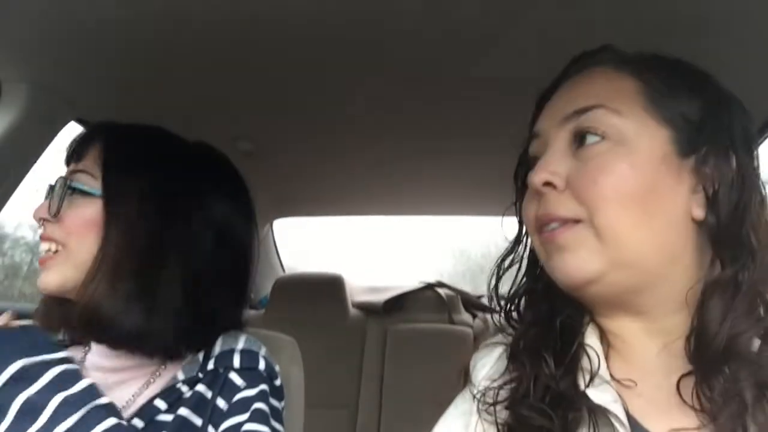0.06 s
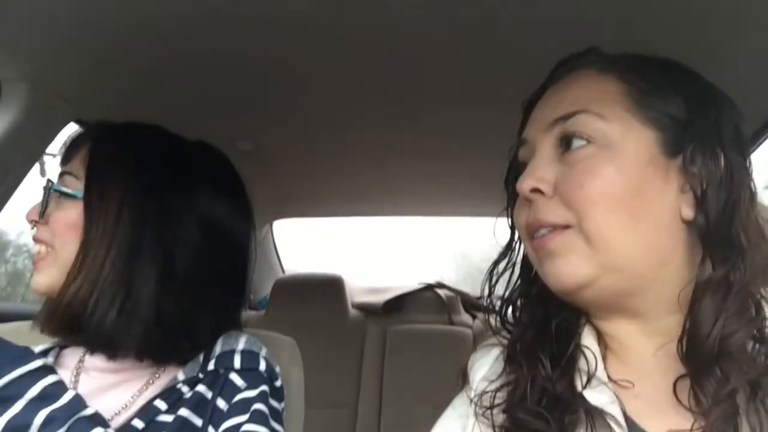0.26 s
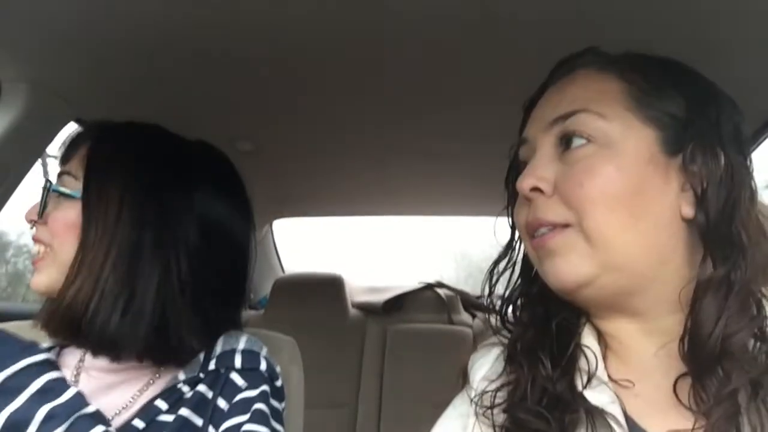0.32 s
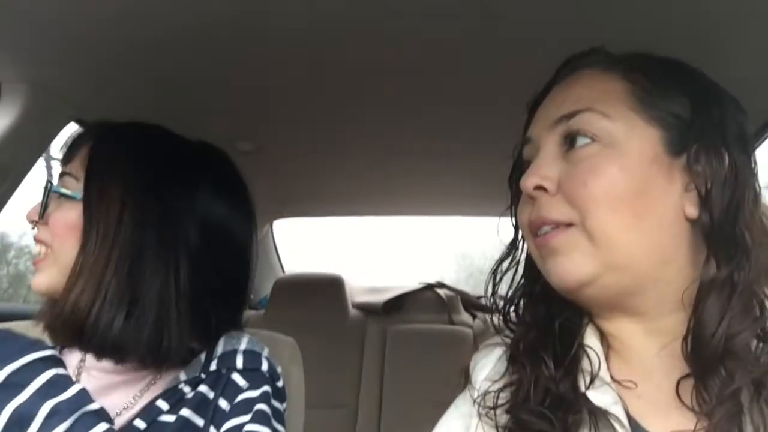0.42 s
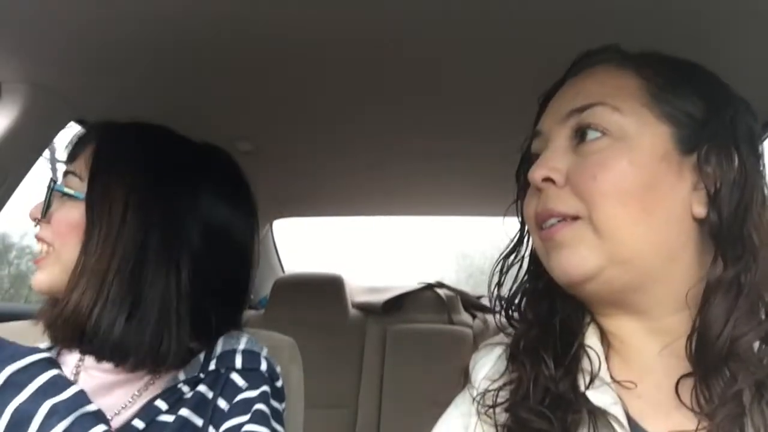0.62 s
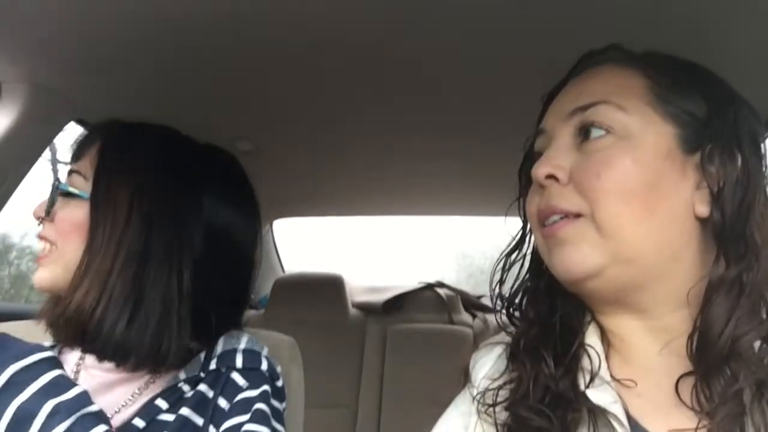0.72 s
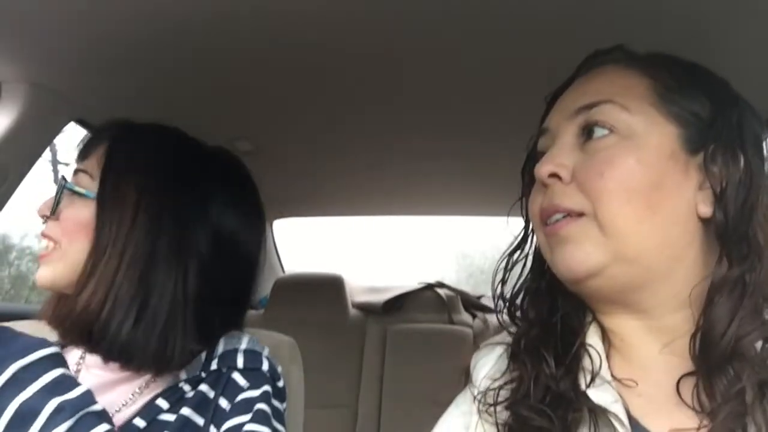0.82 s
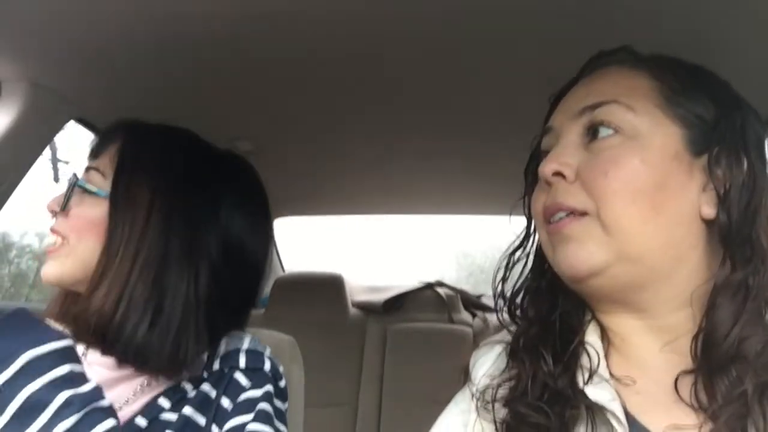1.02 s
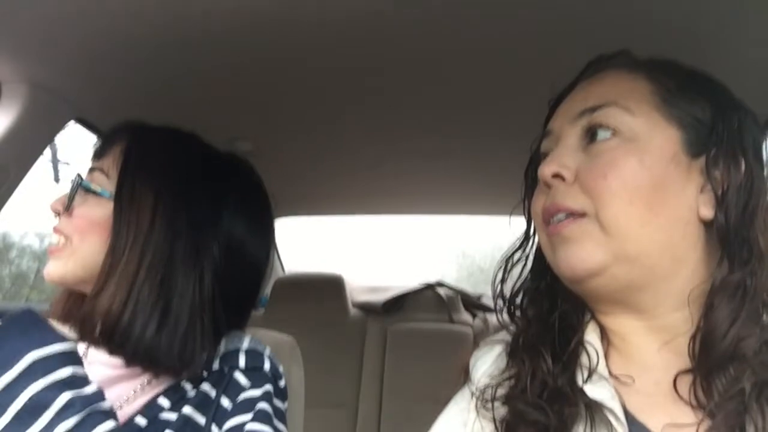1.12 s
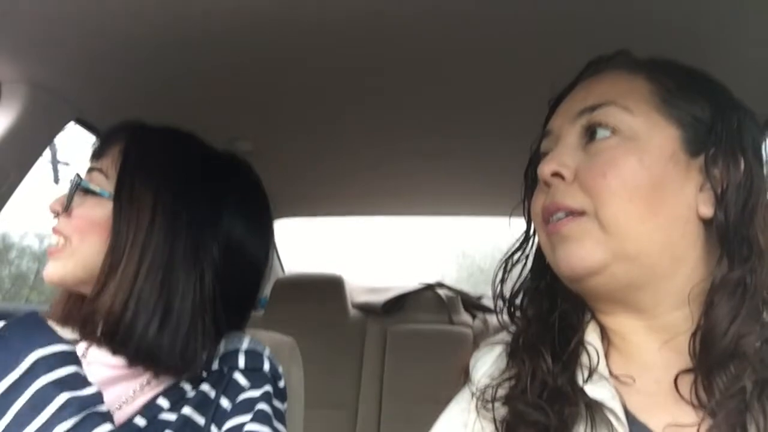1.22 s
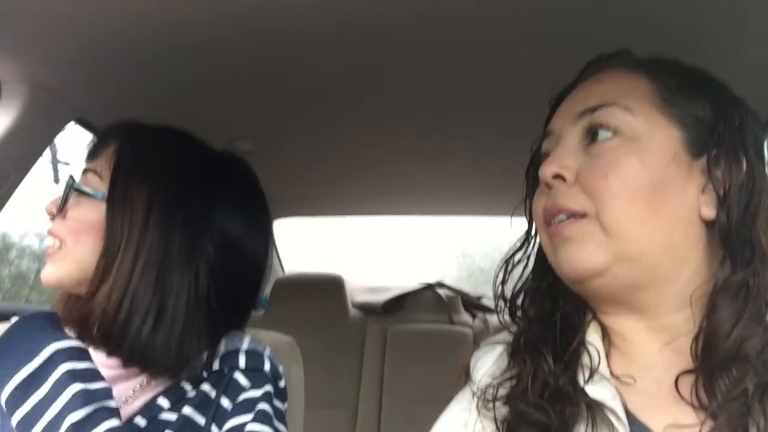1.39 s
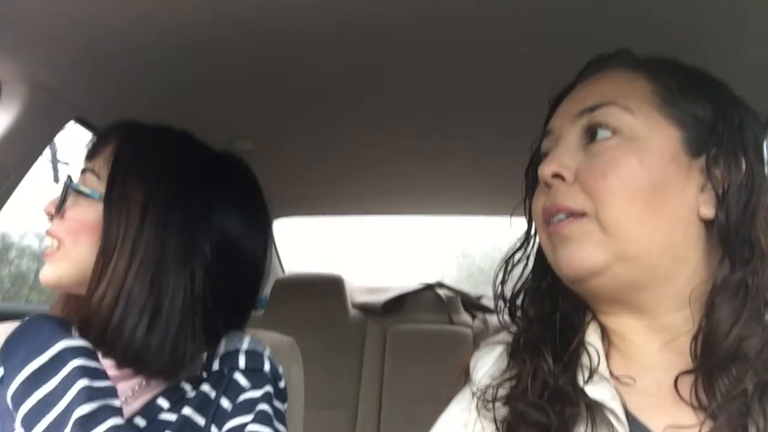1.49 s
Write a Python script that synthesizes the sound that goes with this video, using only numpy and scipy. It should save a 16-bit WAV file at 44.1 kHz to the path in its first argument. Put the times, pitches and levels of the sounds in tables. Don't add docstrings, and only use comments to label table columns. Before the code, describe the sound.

Power window switch clicks, door mechanism knocks and thuds, then motor whine and rubbing glass

```python
import sys
import numpy as np
from scipy import signal
from scipy.io import wavfile

SR = 44100
rng = np.random.default_rng(int(sys.argv[2]) if len(sys.argv) > 2 else 0)


def invert_db(x):
    u = np.asarray(x, float) / 20
    return 10 ** u


def unload_audio(sound):
    columns = np.transpose(np.atleast_2d(sound))
    steps = np.round(np.clip(columns, -1, 1) * 32767)
    wavfile.write(sys.argv[1], SR, steps.astype(np.int16))


N = 68355

# (frequency [Hz], density [dB per Hz])
CABIN_SPECTRUM = [(79, -5.5), (135, -30), (143, -41), (250, -10), (648, -13.5), (702, -24), (927, -26),
                  (14100, -43), (15500, -54)]
CABIN_DB = -65.5
BOOM_HZ, BOOM_WIDTH_HZ, BOOM_DB = 101.6, 57, -65
HISS_FLICKER_DB = 0.6

# (multiple of firing rate [-], level [dB])
IDLE_ORDERS = [(2, 1), (3, -8), (4, -8.5), (5, -18)]
# (time [s], level [dB])
IDLE_HUNTING = [(0.0, -44), (0.064, -57), (0.138, -50), (0.176, -48), (0.21, -94), (0.28, -54),
                (0.388, -52), (0.444, -42), (0.492, -50.5), (0.958, -50.5), (1.018, -56.5), (1.38, -53),
                (1.498, -50), (1.55, -46)]
# (frequency [Hz], level [dB], t60 [s])
INJECTOR_TICK = [(6750, -74, 0.015), (8950, -75, 0.0094), (12100, -75, 0.01)]
FIRING_HZ, FIRING_PEAK_S, FIRST_TICK_S = 23.0, 0.031, 0.0435
IDLE_DB, IDLE_WOBBLE_DB, ORDER_LAG_RAD = -1, 1.2, 2.0

# (time [s], level [dB])
SHUDDER_LEVEL = [(.17, -99), (.205, -40.5), (.25, -46), (.3, -48), (.335, -48), (.39, -47.5), (.43, -52.5),
                 (.47, -56), (.54, -62), (.67, -57), (.78, -60), (.86, -64), (.94, -91), (1.05, -63.5),
                 (1.2, -71), (1.27, -62), (1.36, -65.5), (1.55, -60)]
# (frequency [Hz], width [Hz], level [dB])
SKIN_MODES = [(150, 74, -2), (220, 102, -0.5), (305, 72, -5.5), (359, 103, -3.5)]
# (time [s], peak level [dB], pitch [Hz], t60 [s])
SKIN_THUDS = [(0.10, -47.5, 98, 0.15), (0.182, -36, 92, 0.1), (0.369, -33, 80, 0.055),
              (0.21, -23, 110, 0.045), (0.216, -40, 62.8, 0.55), (0.26, -40.5, 164.5, 0.095),
              (0.273, -38, 67, 0.044), (0.241, -31, 147.7, 0.11), (0.323, -34.5, 89.8, 0.17),
              (0.377, -18.5, 77, 0.048), (0.444, -29, 68, 0.039)]

# (time [s], peak level [dB], colour centre [Hz], rattle length [s], colour width [octaves])
KNOCK_EVENTS = [(0.15, -59, 590, 0.01, 0.57), (.166, -61, 1990, 0.018, 0.16),
                (0.188, -54, 1800, .002, 0.16), (.200, -39.5, 2530, 0.0022, 0.49),
                (.201, -39, 810, 0.067, 0.45), (.204, -35.5, 384, 0.0066, 0.35),
                (0.2309, -25.5, 3240, 0.0009, 0.66), (.2345, -37, 3070, 0.0027, 1.1),
                (0.2622, -26, 1710, 0.0029, 0.63), (.265, -27.5, 575, 0.0096, 0.41),
                (0.2653, -28.5, 5540, 0.0046, .8), (0.2664, -23, 2000, 0.00075, 2.26),
                (.2665, -22, 1185, 0.0061, 0.37), (0.2695, -27.5, 3020, 0.002, 0.67),
                (0.2723, -36, 1120, 0.0041, 1.4), (0.276, -33.5, 1280, 0.016, 1.2),
                (0.288, -37.5, 390, 0.0044, 0.48), (.30, -41, 1000, 0.075, 1.03),
                (0.31, -41.5, 3060, 0.0071, 0.57), (0.334, -40, 1300, 0.0056, 1.8),
                (0.343, -38, 443, .004, 0.73), (.374, -46, 1500, 0.0073, 0.57),
                (.6275, -38, 1300, 0.0043, 0.54), (0.6255, -40.5, 520, 0.007, 0.42),
                (0.634, -46, 450, .004, .6), (1.116, -49, 340, 0.016, 0.59)]
# (frequency [Hz], level [dB])
LINKAGE_MODES = [(355, 4.5), (595, 2.5), (700, -4.5), (825, -7), (1090, -4.5), (1170, 8), (1430, -1.5),
                 (1720, 4), (2100, 0), (2350, -2.5), (3050, -2), (4200, 3.5), (6250, -4), (8150, 1)]
RATTLE_PER_S, CRUNCH_DB, CONTACT_CUT_HZ = 2100, -5, 11500
LINKAGE_T60_S, DAMPING_SLOPE = 0.028, 0.22

# (time [s], commutator pitch [Hz], whine level [dB])
MOTOR_RUN = [(0.401, 1353, -78), (.47, 1317, -75), (0.54, 1311, -58), (.60, 1308, -55.5),
             (.632, 1316, -50.5), (0.65, 1220, -64), (.68, 1257, -60.5), (0.726, 1274, -55.5),
             (0.766, 1218, -62), (0.83, 1211, -56.5), (0.904, 1164, -59.5), (1.01, 1145, -55.5),
             (1.041, 1088, -55.5), (1.151, 1101, -58.5), (1.31, 1086, -58.5), (1.448, 1084, -59.5),
             (1.55, 1104, -57.5)]
# (multiple of shaft speed [-], level against whine [dB], resonance [Hz], width [Hz])
SHAFT_ORDERS = [(1, -3.5, 108, 6), (7, -12.5, 890, 60), (9, -12, 972, 10), (11, -9, 1340, 40),
                (19, -14, 2075, 14)]
COMMUTATOR_SEGMENTS = 10
WHINE_WOBBLE_DB, ORDER_WOBBLE_DB, PITCH_JITTER = 2.0, 3.5, 0.006
# (time [s], level [dB])
DRIVE_EFFORT = [(.183, -100), (.19, -62), (.215, -51.5), (.245, -54), (.258, -58), (.272, -44.5),
                (.292, -59.5), (.316, -48.5), (.345, -51), (.36, -52), (.385, -53), (.41, -54.5),
                (.6, -53.5), (.75, -55), (1.16, -55.5), (1.38, -56.5), (1.55, -59)]
# (frequency [Hz], width [Hz], level [dB])
PANEL_MODES = [(340, 31, -2), (1395, 62, -0.5), (1814.6, 20, 6), (1954, 39, -1.5), (2072, 24, -2.5),
               (2230, 117, -3.5), (2578, 65, -1), (2922, 123, -3), (3350, 106, 0), (3835, 138, -4.5),
               (4420, 275, -9), (6260, 650, -11.5), (7670, 510, -14.5), (8970, 1060, -19.5)]
BRUSH_DB, TURN_DEPTH, PANEL_FLICKER_DB = 0.5, 0.16, 2.5
SMALL_MODES, SMALL_WIDTH_HZ, SMALL_FLICKER_DB = 90, 36, 3.5
SMALL_DB, SMALL_TILT_DB_PER_OCT = -6.5, -6.5
# (frequency [Hz], density [dB per Hz])
SEAL_SPECTRUM = [(76, -47), (130, -55), (159, -8.5), (383, -14), (772, -8.5), (1860, -6), (3330, -12),
                 (7710, -21.5), (15500, -33.5)]
# (time [s], level [dB])
SEAL_PRESSURE = [(.2, -25), (.23, 1.5), (.33, 2.5), (.42, -2), (.5, 3), (.62, -5), (.72, 1), (.85, 1),
                 (1.0, 2), (1.19, 3.5), (1.25, 0.5), (1.4, 0), (1.5, 2.5), (1.55, 5)]
SEAL_DB, SEAL_GRIPS_S, BRIGHT_FROM_HZ = -2.5, 0.224, 5500
# (frequency [Hz], width [Hz], depth at start [0-1], depth at end [0-1])
DOOR_HOLLOWS = [(480, 130, 0.74, .3), (1040, 210, .75, 0), (815, 360, 0, 0.84), (1430, 490, 0.24, 0.49)]

MIC_LOW_HZ, TOP_HZ = 30, 15800


def rms_one(x):
    return x / np.sqrt(np.mean(x ** 2) + 1e-20)


def in_time(rows, before=None):
    s, *columns = np.transpose(rows)
    return [np.interp(np.arange(N) / SR, s, c, left=before) for c in columns]


def drift(rate_hz):
    r = np.exp(-2 * np.pi * rate_hz / SR)
    white = rng.standard_normal(N + SR)
    return rms_one(signal.lfilter([1], [1, -2 * r, r * r], white)[SR:])


def resonate(x, hz, width_hz):
    r = np.exp(-np.pi * width_hz / SR)
    poles = [1, -2 * r * np.cos(2 * np.pi * hz / SR), r * r]
    return signal.lfilter([(1 - r * r) / 2, 0, (r * r - 1) / 2], poles, x)


def ring(clicks, hz, t60):
    r = invert_db(-60 / (t60 * SR))
    w = 2 * np.pi * hz / SR
    return signal.lfilter([0, np.sin(w)], [1, -2 * r * np.cos(w), r * r], clicks + 1e-18)


def banded_noise(spectrum, patchy_db):
    out = 0
    edges = 22 * 2 ** np.arange(0, 10, 0.5)
    white = rng.standard_normal((2, N + 9000))
    hz, db = np.transpose(spectrum)
    for k, (low, high) in enumerate(zip(edges, edges[1:])):
        sos = signal.butter(2, [low, high], "band", fs=SR, output="sos")
        band = signal.sosfilt(sos, white[k % 2])[-N:]
        band_db = np.interp(np.log(low * high) / 2, np.log(hz), db)
        out = out + band * invert_db(band_db + patchy_db * drift(10.0))
    return rms_one(out)


def cabin():
    boom = resonate(rng.standard_normal(N + SR), BOOM_HZ, BOOM_WIDTH_HZ)
    boom = resonate(boom, BOOM_HZ, 2 * BOOM_WIDTH_HZ)[SR:]
    floor = banded_noise(CABIN_SPECTRUM, HISS_FLICKER_DB)
    return invert_db(BOOM_DB) * rms_one(boom) + invert_db(CABIN_DB) * floor


def engine():
    firing_time = np.cumsum(1 + 0.004 * drift(3)) / SR - FIRING_PEAK_S
    phase = 2 * np.pi * FIRING_HZ * firing_time
    hunt_db, = in_time(IDLE_HUNTING)
    out = np.zeros(N)
    for k, db in IDLE_ORDERS:
        order_db = db + IDLE_DB + (hunt_db if k == 2 else hunt_db.mean())
        level = np.sqrt(2) * invert_db(order_db + IDLE_WOBBLE_DB * drift(2.0))
        out += level * np.cos(k * phase - ORDER_LAG_RAD / k)
    clicks = np.zeros(N)
    clicks[(np.arange(FIRST_TICK_S, N / SR, 1 / FIRING_HZ) * SR).astype(int)] = 1
    for hz, db, t60 in INJECTOR_TICK:
        out += invert_db(db) * ring(clicks * invert_db(1.7 * rng.standard_normal(N)), hz, t60)
    return out


def shudder():
    level_db, = in_time(SHUDDER_LEVEL, before=-120)
    shake = np.zeros(N)
    for hz, width_hz, db in SKIN_MODES:
        force = rng.standard_normal(N)
        shake += invert_db(db) * resonate(resonate(force, hz, width_hz), hz, 2 * width_hz)
    out = invert_db(level_db) * rms_one(shake)
    for s, peak_db, hz, t60 in SKIN_THUDS:
        t = np.maximum(np.arange(N) / SR - s, 0)
        onset = 1 - np.exp(-t * hz)
        out -= invert_db(peak_db - 60 * t / t60) * onset * 2 * np.sin(2 * np.pi * hz * t)
    return out


def knocks():
    out = np.zeros(N + SR)
    t = np.arange(SR // 5) / SR
    for s, db, centre_hz, rattle_s, octaves in KNOCK_EVENTS:
        fade = np.exp(-(t / rattle_s) ** 2)
        hits = (rng.random(len(t)) < RATTLE_PER_S / SR) * fade
        hits[0] = 1.5
        rattle = np.zeros(len(t))
        for hz, mode_db in LINKAGE_MODES:
            off_db = 5 * (np.log2(hz / centre_hz) / octaves) ** 2
            t60 = LINKAGE_T60_S * (1000 / hz) ** DAMPING_SLOPE
            struck = ring(hits * rng.choice([-1, 1], len(t)), hz, t60)
            rattle += invert_db(mode_db - off_db + 1.5 * rng.standard_normal()) * struck
        width_hz = octaves * centre_hz
        crunch = resonate(rng.standard_normal(len(t)) * fade, centre_hz, width_hz)
        crunch = resonate(crunch, centre_hz, 2 * width_hz)
        knock = rattle / np.abs(rattle).max() + invert_db(CRUNCH_DB) * crunch / np.abs(crunch).max()
        i = int(s * SR)
        out[i:i + len(t)] += invert_db(db) * knock
    return signal.sosfilt(signal.butter(2, CONTACT_CUT_HZ, fs=SR, output="sos"), out[:N])


def motor_tones(hz, turn):
    tones = invert_db(WHINE_WOBBLE_DB * drift(29)) * np.sin(COMMUTATOR_SEGMENTS * turn)
    for k, level_db, top_hz, width_hz in SHAFT_ORDERS:
        order_hz = k * hz / COMMUTATOR_SEGMENTS
        off_db = np.minimum(6 * ((order_hz - top_hz) / width_hz) ** 2, 14)
        level = invert_db(level_db - off_db + ORDER_WOBBLE_DB * drift(2.7))
        tones += level * np.sin(k * turn + rng.uniform(0, 2 * np.pi))
    return tones


def rubbing_noise(turn):
    brush = rng.standard_normal(N) * (1 + TURN_DEPTH * np.sin(turn))
    panel, small = np.zeros(N), np.zeros(N)
    for k, (hz, width_hz, db) in enumerate(PANEL_MODES):
        level = invert_db(db + PANEL_FLICKER_DB * drift(7.4))
        panel += (-1) ** k * level * resonate(brush, hz, width_hz)
    for hz in 1500 + 8500 * rng.random(SMALL_MODES) ** 1.5:
        level = invert_db(SMALL_TILT_DB_PER_OCT * np.log2(hz / 2000) + SMALL_FLICKER_DB * drift(1.55))
        width_hz = SMALL_WIDTH_HZ * hz / 2000
        small += level * resonate(resonate(brush, hz, width_hz), hz, 4 * width_hz)
    grip = np.clip(1 + (np.arange(N) / SR - SEAL_GRIPS_S) / 0.023, 0, 1) ** 2
    hiss = banded_noise(SEAL_SPECTRUM, HISS_FLICKER_DB)
    rub = invert_db(SMALL_DB) * rms_one(small) + invert_db(SEAL_DB) * hiss
    noise = invert_db(BRUSH_DB) * rms_one(panel) + grip * rub
    for hz, width_hz, first, last in DOOR_HOLLOWS:
        noise = noise - np.linspace(first, last, N) * resonate(noise, hz, width_hz)
    dull = signal.sosfiltfilt(signal.butter(2, BRIGHT_FROM_HZ, fs=SR, output="sos"), noise)
    pressure_db, = in_time(SEAL_PRESSURE)
    return dull + invert_db(pressure_db) * (noise - dull)


def motor():
    hz, whine_db = in_time([(0.3, 1330, -100)] + MOTOR_RUN)
    jittered_hz = hz * (1 + PITCH_JITTER * drift(12.6))
    turn = 2 * np.pi * np.cumsum(jittered_hz) / COMMUTATOR_SEGMENTS / SR
    effort_db, = in_time(DRIVE_EFFORT, before=-120)
    return np.sqrt(2) * invert_db(whine_db) * motor_tones(hz, turn) + invert_db(effort_db) * rubbing_noise(turn)


def scene():
    return (cabin() + engine() + shudder() + knocks() + motor())[None]


def roll_off(x):
    return signal.sosfilt(signal.butter(12, 15690, fs=SR, output="sos"), x)


def record(dry):
    x = signal.sosfilt(signal.butter(2, MIC_LOW_HZ, "high", fs=SR, output="sos"), dry)
    x = signal.sosfilt(signal.cheby2(24, 50, TOP_HZ, fs=SR, output="sos"), x)
    return roll_off(x)


dry = scene()
out = record(dry)
unload_audio(out)
```